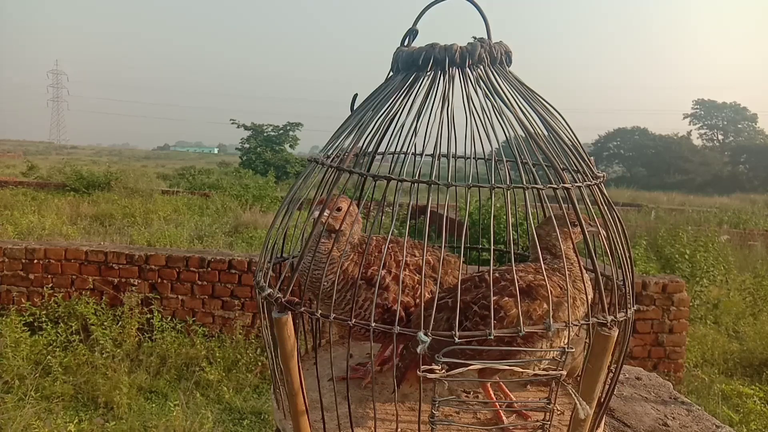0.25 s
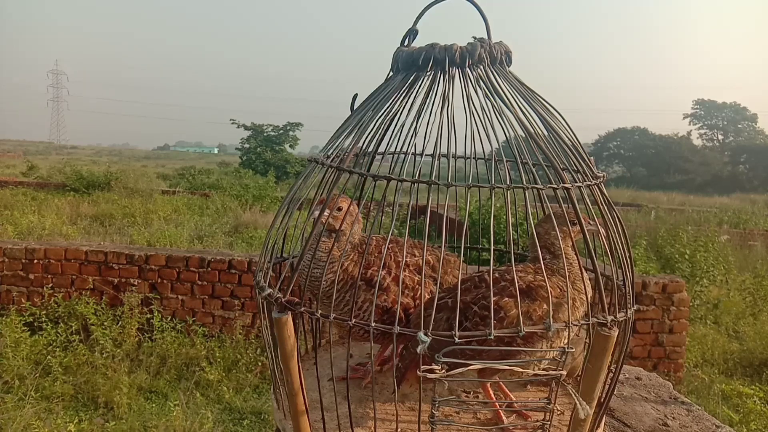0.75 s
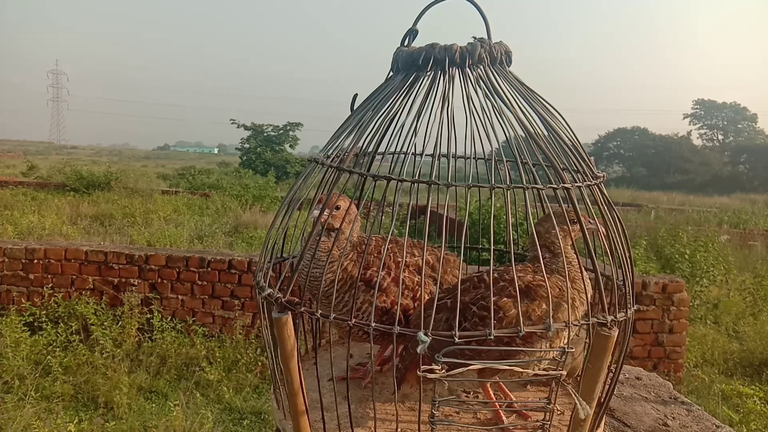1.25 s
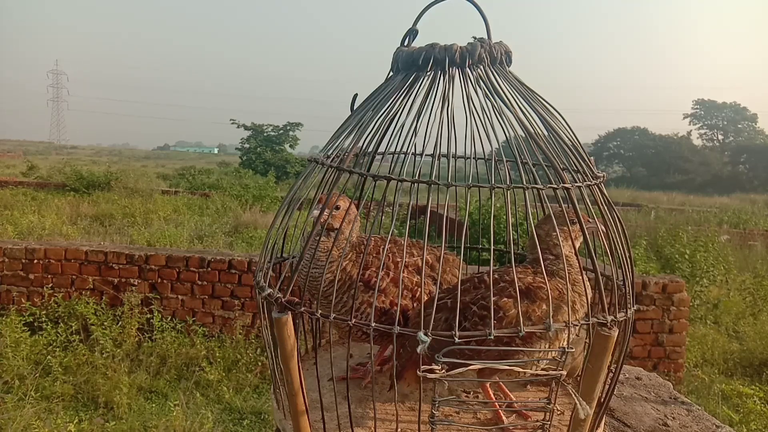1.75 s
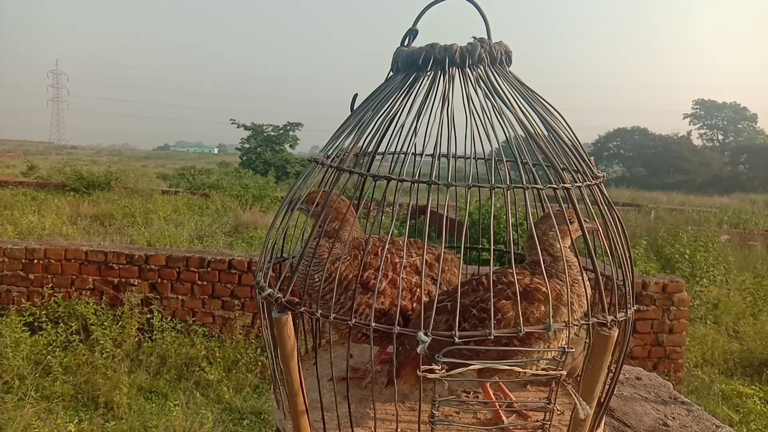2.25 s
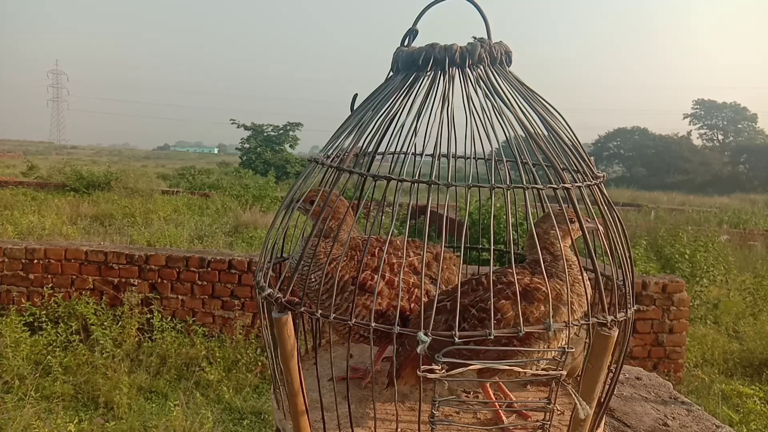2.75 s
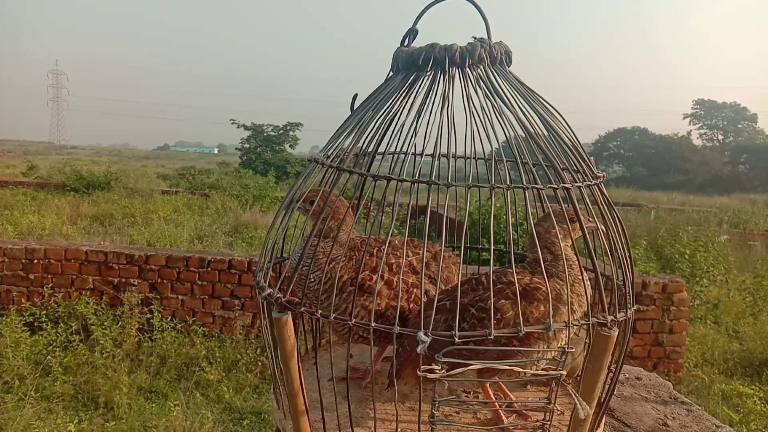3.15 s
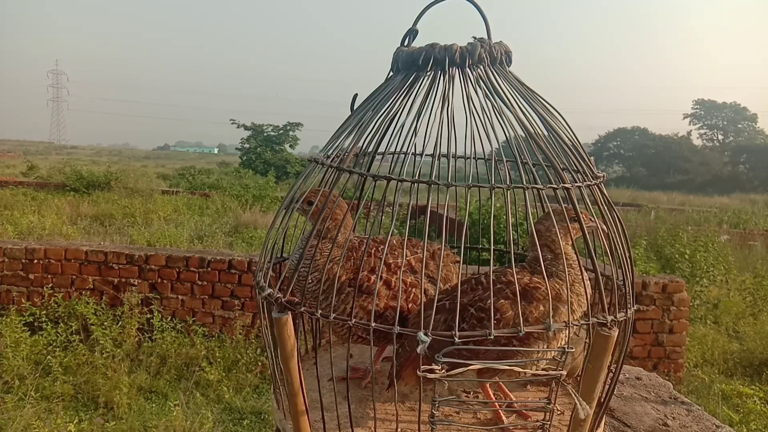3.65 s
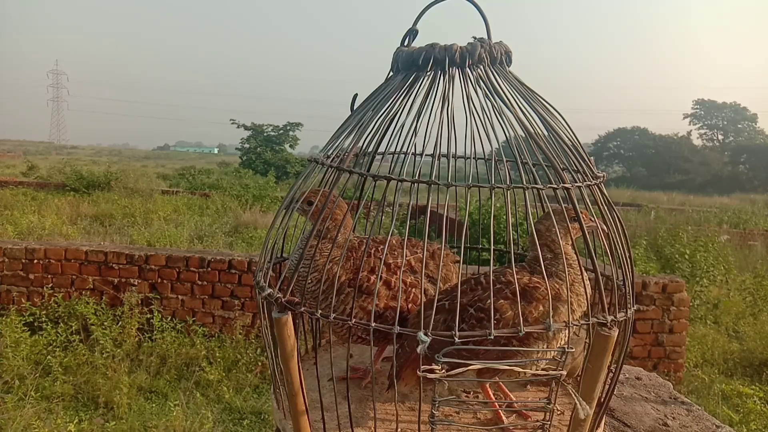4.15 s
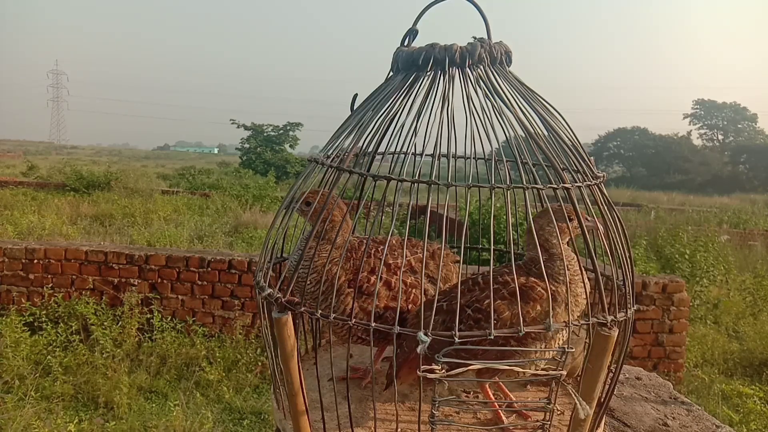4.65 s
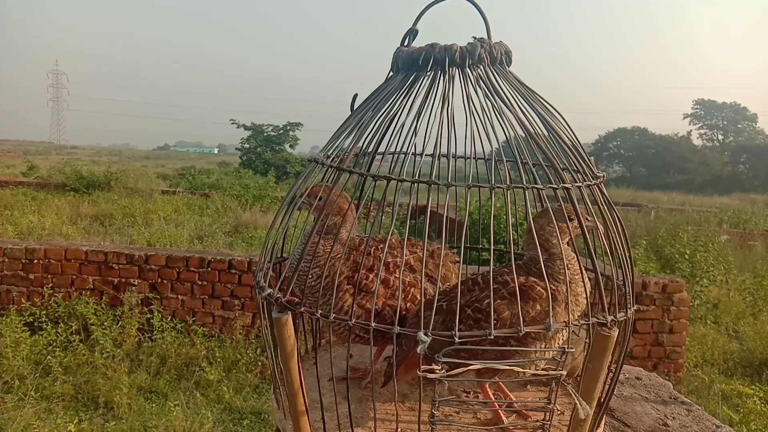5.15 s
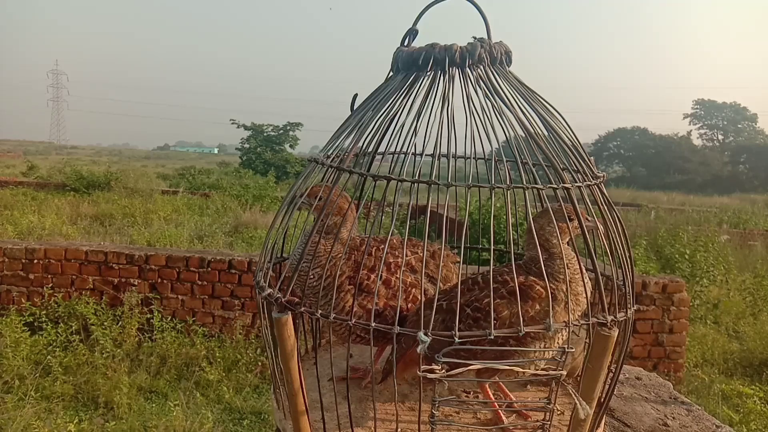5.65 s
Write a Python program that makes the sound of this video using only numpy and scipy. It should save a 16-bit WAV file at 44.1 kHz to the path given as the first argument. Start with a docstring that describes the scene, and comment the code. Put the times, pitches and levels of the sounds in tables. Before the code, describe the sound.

One sharp two-note cluck from a caged francolin close by, amid steady cricket chirping and faint bird whistles in quiet open grassland.

```python
"""A caged francolin close by clucks two notes in open grassland: harmonics filtered by vocal-tract resonances.
Crickets chirp near and far, each wing stroke a swelling tone of falling pitch, and one insect buzzes in phrases
of rapid rings. Small birds give near-sine whistles and faint twitter, and noise bursts scratch at the cage.
Beneath lie an engine hum with its octave, a whir of band noise, and rumble and hiss of shaped noise."""
import sys
import numpy as np
from scipy import signal
from scipy.io import wavfile
from scipy.ndimage import uniform_filter1d

SR = 44100
rng = np.random.default_rng(int(sys.argv[2]) if len(sys.argv) > 2 else 0)


def generate_wav(sig):
    """Save sig (samples, or channels by samples) to the path in sys.argv[1] as 16-bit PCM at SR."""
    pcm = np.round(np.clip(np.atleast_2d(sig).T, -1, 1) * 32767).astype(np.int16)
    wavfile.write(sys.argv[1], SR, pcm)


N = 261072


def gain_of(db):
    """Decibels to amplitude ratio: 20 dB a factor of ten."""
    return 10 ** (np.asarray(db) / 20)


def evened(x):
    """Normalisation to unit root-mean-square amplitude."""
    return x / np.sqrt(np.mean(x ** 2) + 1e-20)


def read(points, hz):
    """Spectral interpolation, linear in level along logarithmic frequency."""
    f, value = np.transpose(points)
    return np.interp(np.log(hz + 1), np.log(f + 1), value)


def add(mix, s, sound):
    """Superposition: the sound is summed into the mix at time s, cut off at both ends of the mix."""
    at = round(s * SR)
    part = mix[max(at, 0):][:len(sound) + min(at, 0)]
    part += sound[max(-at, 0):][:len(part)]


def unroll(rows):
    """Piecewise-linear modulation: turning points become time and one curve a column."""
    s, *columns = np.transpose(rows)
    t = np.arange(s[0], s[-1], 1 / SR)
    return t, *(np.interp(t, s, c) for c in columns)


def wander(length, hz):
    """Low-pass filtered noise: a random modulation of rms near 1 with fluctuations mostly below hz."""
    low_pass = signal.butter(2, hz, fs=SR, output="sos")
    drift = signal.sosfiltfilt(low_pass, rng.standard_normal(length + SR))
    return evened(drift)[SR // 2:][:length]


def band_noise(length, hz, width):
    """Band-pass filtered noise: random sound of rms 1 around one frequency."""
    edges = [max(hz - width / 2, 40), hz + width / 2]
    band_pass = signal.butter(2, edges, "band", fs=SR, output="sos")
    return evened(signal.sosfilt(band_pass, rng.standard_normal(length + 500))[500:])


def coloured(spectrum, patchy_db):
    """Spectral shaping: random short-time spectra with drifting patches, evened to rms 1."""
    hz = np.fft.rfftfreq(2048, 1 / SR)
    a, b, patches = rng.standard_normal((N // 512 + 5, 1025, 3)).T
    smooth_in_hz = uniform_filter1d(patches, 20, 0)
    patches = evened(uniform_filter1d(smooth_in_hz, 6, 1))
    level_db = read(spectrum, hz)[:, None] + patchy_db * patches
    z = (a + 1j * b) * gain_of(level_db)
    return evened(signal.istft(z, nperseg=2048, noverlap=1536)[1][:N])


def echoes(x, t60, first_s):
    """Diffuse reverberation: convolution with a decaying noise tail of energy 1, falling 60 dB in t60 seconds."""
    t = np.arange(SR // 2) / SR
    tail = rng.standard_normal(len(t)) * gain_of(-60 * t / t60) * (t > first_s)
    return signal.fftconvolve(x, tail / np.linalg.norm(tail))[:N]


def peak(hz, centre_hz, width):
    """Resonance: the complex gain of a single resonator passed twice."""
    return 1 / (1 + 2j * (hz - centre_hz) / width) ** 2


def vocal_tract(f, effort_db, throat_hz, beak_db):
    """Source-filter theory: a moving throat resonance and four fixed ones, three subtracted and one added."""
    rim_db = -18 + 0.0086 * (throat_hz - 1600)  # the rim resonance grows as the throat resonance rises
    top_db = -15.5 + rim_db + 1.7 * (effort_db + 22)  # only the loudest effort reaches the top
    tract = peak(f, throat_hz, 600)
    tract -= gain_of(-9) * peak(f, 550, 600)  # chest
    tract -= gain_of(beak_db) * peak(f, 2280, 600)
    tract += gain_of(rim_db) * peak(f, 3650, 910)
    tract /= 1 + (f / (4200 * (throat_hz / 1650) ** .3)) ** 40  # little passes above the rim resonance
    tract -= gain_of(top_db) * peak(f, 5400, 760)
    return tract / (1 + (f / 6300) ** 30)


def cluck(rows):
    """Harmonic series of the syrinx filtered by the tract, with rasp and breath noise: (start s, sound)."""
    t, hz, effort_db, throat_hz, beak_db = unroll(rows)
    turns = np.cumsum(hz * (1 + 0.0065 * wander(len(t), 300))) / SR
    k = np.arange(1, 22)[:, None]  # harmonic numbers
    tract = vocal_tract(k * hz, effort_db, throat_hz, beak_db)
    voice = (tract * np.exp(2j * np.pi * k * turns)).real.sum(0)
    roughness = np.clip(.03 * gain_of(-effort_db - 23.5), 0, 1)  # rougher as the voice weakens
    rasp = roughness * wander(len(t), 900) * voice
    air = gain_of(effort_db - 37) * band_noise(len(t), 14500, 1400)  # a thin hiss at full effort
    return t[0], gain_of(effort_db) * (voice + rasp + air) * signal.windows.tukey(len(t), .05)


def francolin():
    """Direct sound and reverberation: two clucks with returns from cage, then wall and bushes."""
    # one table a note:
    # (time [s], pitch [Hz], effort [dB], throat resonance [Hz], beak resonance [dB])
    clucks = [
        [(1.711, 514, -57.5, 1000, -12), (1.72, 590, -33, 1000, -17), (1.734, 709, -27.5, 1373, -21),
         (1.742, 710, -22, 1570, 0), (1.762, 765, -18.5, 1750, -1), (1.775, 820, -17.5, 1670, -3),
         (1.785, 784, -17, 1700, -0.5), (1.789, 703, -44, 1594, 4), (1.798, 535, -47.5, 1600, -1)],
        [(1.803, 609, -48, 1590, -4), (1.809, 598.4, -25.5, 1630, -12), (1.825, 544.7, -26, 1700, -7.5),
         (1.84, 534.4, -25.5, 1635, -7.5), (1.856, 617.6, -26.5, 1460, -4.5), (1.866, 541, -28, 1580, -0.5),
         (1.877, 412.6, -28, 1300, -37), (1.89, 368.5, -34.5, 1290, -32), (1.908, 333, -38.5, 1320, -30),
         (1.921, 313.4, -42.5, 1260, -35), (1.929, 299, -75, 1240, -19.5)],
    ]
    bird = np.zeros(N)
    for rows in clucks:
        add(bird, *cluck(rows))
    bright_band = signal.butter(4, [2850, 4600], "band", fs=SR, output="sos")
    bright = signal.sosfilt(bright_band, bird)
    cage_return = gain_of(-19.5) * echoes(bird, .1, .003)
    wall_return = gain_of(-17.5) * echoes(bright, 0.36, 0.05)
    return bird + cage_return + wall_return


def chirp(first, last, first_db, last_db, gap_s):
    """Pulse-train timing: times and levels of strokes that slow down while the level climbs early."""
    x = np.linspace(0, 1, round((last - first) / gap_s) + 1)
    times = first + (last - first) * x ** 1.15
    levels_db = last_db + (first_db - last_db) * (1 - x) ** 2.2
    return zip(times, levels_db)


def stroke(db, ms, hz, fall_hz_s, rough, phase):
    """Stridulation: a wing tone of falling pitch swells to 70% of its length, then stops short."""
    share = np.arange(round(ms * SR / 1000)) / (ms * SR / 1000)
    u = (share - .7) * ms / 1000  # seconds from the loudest point
    swell = np.sin(np.pi / 2 * share / .7) ** 2.8
    stop = abs(np.cos(np.pi / 2 * (share - .7) / .3)) ** 0.69
    shape = np.where(share < .7, swell, stop)
    flutter = 1 + rough * np.sin(2 * np.pi * (260 * u + 7 * phase))  # uneven grip of the scraper
    turns = hz * u - fall_hz_s * u ** 2 / 2 + phase
    tone = np.sin(2 * np.pi * turns) + gain_of(-41) * np.sin(4 * np.pi * turns)
    return gain_of(db) * shape * flutter * tone


def near_cricket():
    """Stridulation in pulse trains: quick chirps and slow loud closers, weaker strokes being shorter."""
    # quick chirps: (first stroke [s], last stroke [s], first level [dB], last level [dB])
    quick_chirps = [(.186, .222, -50, -42.5), (.335, .354, -50, -43.5), (.467, .483, -56, -47.5),
                    (.591, .644, -50, -40.5), (.844, .861, -49, -44.5), (.975, .99, -49, -44.5),
                    (1.103, 1.118, -50.5, -46.5), (1.237, 1.273, -49.5, -44), (1.468, 1.503, -50.5, -42.5),
                    (1.612, 1.631, -53, -43), (1.897, 1.941, -45, -40.5), (2.142, 2.16, -50.5, -44),
                    (2.271, 2.289, -51.5, -43.5), (2.407, 2.423, -49, -44.5), (2.523, 2.572, -54, -44),
                    (2.68, 2.716, -58, -41), (2.92, 2.959, -52, -42.5), (3.069, 3.082, -51.5, -45.5),
                    (3.208, 3.224, -49.5, -43), (3.333, 3.363, -54, -44), (3.48, 3.514, -52.5, -41),
                    (3.721, 3.756, -49.5, -42.5), (3.86, 3.892, -54.5, -44.5), (4.007, 4.022, -50, -49),
                    (4.137, 4.173, -49, -44), (4.286, 4.324, -53.5, -41.5), (4.507, 4.562, -52.5, -44.5),
                    (4.68, 4.695, -53, -48), (4.811, 4.83, -52, -44.5), (4.94, 4.958, -50, -44),
                    (5.07, 5.108, -56.5, -41), (5.372, 5.386, -54.5, -46.5), (5.553, 5.57, -53, -46),
                    (5.69, 5.723, -56.5, -43.5), (5.89, 5.908, -59, -55)]
    # two slow, loud strokes close each phrase:
    # (first stroke [s], last stroke [s], first level [dB], last level [dB])
    closers = [(.025, .064, -39, -37), (.686, .723, -37.5, -45.5), (1.311, 1.349, -38.5, -37.5),
               (1.982, 2.019, -37.5, -40.5), (2.756, 2.794, -38, -38), (3.556, 3.595, -37, -37),
               (4.363, 4.403, -38, -37), (5.148, 5.189, -37, -36.5)]
    out = np.zeros(N)
    for rows, gap_s in [(quick_chirps, .0185), (closers, .037)]:  # usual time from stroke to stroke
        for row, phases in zip(rows, rng.random((len(rows), 8))):
            for (s, db), phase in zip(chirp(*row, gap_s), phases):
                ms = max(21 + .8 * (db + 38), 10)
                hz = 5740 * (1 + 0.0089 * np.cos(40 * phase))  # pitch varies from stroke to stroke
                add(out, s - .00068 * ms, stroke(db, ms, hz, 42000, 0.15, phase))
    return out


def farther_crickets():
    """Stridulation at a slower stroke rate, each chirp on its own pitch, with stronger flutter."""
    # (first stroke [s], last stroke [s], first level [dB], last level [dB], pitch [Hz])
    slow_chirps = [(.002, .04, -47, -47, 5890), (0.03, .031, -52.5, -52.5, 6200),
                   (.155, .23, -53.5, -52, 6240), (.658, .658, -49, -51, 5700),
                   (0.831, .904, -54.5, -52.5, 6400), (1.052, 1.052, -59, -60, 6270),
                   (1.349, 1.349, -53, -52.5, 6200), (1.416, 1.416, -56, -57.5, 6330),
                   (1.525, 1.565, -54.5, -58, 6360), (1.853, 1.853, -54, -55, 5530),
                   (1.992, 1.991, -54, -60, 6100), (2.036, 2.036, -54, -57.5, 5700),
                   (2.17, 2.21, -52.5, -53.5, 6330), (2.597, 2.597, -53, -56, 5700),
                   (2.825, 2.861, -56, -57, 6330), (2.936, 2.978, -67.5, -59.5, 6290),
                   (3.254, 3.252, -55.5, -55, 5680), (3.417, 3.45, -58, -53, 6450),
                   (3.64, 3.755, -62, -60, 6330), (3.784, 3.821, -55, -55.5, 5700),
                   (4.058, 4.132, -59, -57.5, 6330), (4.446, 4.484, -57, -56, 5950),
                   (4.584, 4.585, -51.5, -53, 5630), (4.865, 4.865, -60.5, -57, 5740),
                   (4.715, 4.786, -56.5, -56, 6380), (5.258, 5.336, -56, -57, 5690),
                   (5.376, 5.412, -55, -57, 6330), (5.745, 5.785, -55, -65, 5650)]
    out = np.zeros(N)
    for (*row, hz), phases in zip(slow_chirps, rng.random((len(slow_chirps), 8))):
        for (s, db), phase in zip(chirp(*row, .037), phases):
            add(out, s - .017, stroke(db, 24, hz, 45000, .5, phase))
    return out


def cricket_crowd():
    """Superposition of independent sources: faint chirps of three rising strokes at random times."""
    out = np.zeros(N)
    for s, size, pitch, phase in rng.random((110, 4)):
        hz = 5620 + 700 * pitch ** 2
        for k in range(3):
            db = -72 + 3 * k + 9 * size ** 2
            add(out, s * N / SR + 0.017 * k, stroke(db, 12, hz, 50000, .3, phase))
    return out


def crickets():
    """Specular and diffuse reflection: all crickets with two discrete wall returns and a short tail."""
    out = near_cricket() + farther_crickets() + cricket_crowd()
    wall = sum(gain_of(db) * np.roll(out, round(s * SR)) for s, db in [(.019, -24), (.037, -26.5)])
    return out + wall + gain_of(-20) * echoes(out, 0.06, 0.004)


def buzz():
    """Amplitude modulation: short rings near 6.6 kHz, about 140 a second, each phrase fading in and out."""
    # buzzing phrases: (start [s], end [s], level [dB])
    phrases = [(0, 0.238, -61), (.83, 1.426, -62), (2.201, 2.736, -64), (3.416, 3.973, -67),
               (4.63, 5.275, -66.5)]
    out = np.zeros(N)
    for start, end, db in phrases:
        t = np.arange(start, end, 1 / SR)
        beat = np.cumsum(141 * (1 + .015 * wander(len(t), 20))) / SR % 1
        hz = 6640 + 15 * wander(len(t), 6.5) - 150 * (beat - .5)  # falls within each ring
        ring = np.sin(2 * np.pi * np.cumsum(hz) / SR)
        swell = signal.windows.tukey(len(t), .15) * gain_of(db + 0.47 * wander(len(t), 40))
        add(out, start, swell * abs(np.sin(np.pi * beat)) ** 1.8 * ring)
    return out + gain_of(-12) * echoes(out, .2, .004)


def falling_whistles():
    """Frequency modulation that dies away: long falls warble at first, then run clean."""
    # one table a whistle: (time [s], pitch [Hz], level [dB])
    falls = [
        [(1.32, 4400, -74), (1.36, 4130, -67.5), (1.45, 4060, -65.5), (1.52, 3670, -58), (1.56, 3360, -62.5),
         (1.62, 3103, -55.5)],
        [(4.5, 4480, -76), (4.55, 4120, -68), (4.6, 3790, -62), (4.63, 3650, -59.5), (4.7, 3517, -54),
         (4.815, 3160, -53.5)],
    ]
    warble_s, settle_s = .11, .03
    for rows in falls:
        t, hz, db = unroll(rows)
        yield t, hz, db, 114.4 * np.clip((t[0] + warble_s + settle_s - t) / settle_s, 0, 1)


def pips():
    """Amplitude envelope on a nearly constant pitch: notes that swell, then droop at the end."""
    # (start [s], length [s], pitch [Hz], level [dB])
    notes = [(1.454, .1, 2860, -73), (2.217, 0.086, 3130, -67.5), (2.469, 0.099, 3075, -71.5),
             (2.638, .045, 3190, -74), (3.595, .05, 2930, -79), (5.469, 0.1, 3080, -67.5),
             (5.742, 0.085, 3020, -67)]
    # course of every pip: (share of length, pitch offset [Hz], level offset [dB], warble depth [Hz])
    course = [(0, 2, -12, 0), (.5, -11.5, 3, 0), (.78, -18, -4, 0), (1, -220, 2.5, 0.003)]
    for s, length, hz, db in notes:
        yield unroll([(s + length * x, hz + bend, db + swell, w) for x, bend, swell, w in course])


def trills():
    """Frequency modulation about a falling pitch: high warbled notes, bent again in their last fifth."""
    # (start [s], length [s], top [Hz], bottom [Hz], final bend, upward if positive [Hz], level [dB])
    notes = [(1.107, 0.075, 7220, 6470, 200, -54.5), (2.259, 0.09, 6900, 6440, 1, -60.5),
             (3.254, .075, 7230, 6370, 399.5, -61), (4.32, 0.068, 7050, 6500, 4, -67),
             (5.264, 0.103, 6140, 5990, -1, -56), (5.461, 0.071, 7000, 6320, 251.5, -63)]
    # course of every trill:
    # (share of length, height from bottom 0 to top 1, level offset [dB], warble depth [Hz])
    course = [(0, 1, -7, 20), (.27, .8, -4, 90), (.52, .35, 0.5, 130), (.8, 0, 0.5, 120), (1, 0, 3, 40)]
    for s, length, top, bottom, upturn, db in notes:
        rows = [(s + length * x, bottom + h * (top - bottom), db + swell, w) for x, h, swell, w in course]
        t, hz, level, w = unroll(rows)
        yield t, hz + upturn * np.clip(5 * (t - s) / length - 4, 0, 1), level, w


def glides():
    """Parabolic frequency sweep: plain notes that fade at a constant rate on both sides of their peak."""
    # (start [s], length [s], from [Hz], middle [Hz], to [Hz], peak level [dB], share of length at the peak)
    notes = [(0.118, 0.043, 5200, 5200, 5170, -68, 0.44), (0.153, .06, 4780, 4900, 4800, -66, .15),
             (0.213, 0.039, 4500, 4200, 4020, -76, 0.75), (0.137, 0.098, 3980, 3130, 2610, -76, 0.61),
             (0.438, 0.061, 4600, 4780, 4800, -68, 0.89), (0.628, 0.049, 3630, 3840, 3940, -60.5, 0.53),
             (0.668, .04, 4680, 4730, 4750, -68, .9), (0.725, .055, 5200, 5150, 5100, -63, .3),
             (1.092, 0.15, 4400, 5000, 5220, -61.5, 0.37), (1.168, 0.098, 3240, 3230, 3300, -67, 0.42),
             (1.923, 0.11, 3140, 2700, 2370, -66, 0.29), (3, 0.15, 3730, 3630, 3540, -73, .5),
             (3.211, 0.064, 3590, 3460, 4170, -58, 0.76), (3.24, 0.069, 3350, 2880, 2520, -67, 0.56),
             (3.349, 0.037, 4147, 3880, 3480, -74, 0.87), (3.634, 0.047, 4070, 3690, 3420, -74.5, 0.64)]
    fade_db_s = 302
    for s, length, first, middle, last, db, crest in notes:
        x = np.arange(0, length, 1 / SR) / length
        bow_hz = 4 * (middle - (first + last) / 2) * x * (1 - x)
        hz = first + (last - first) * x + bow_hz
        yield s + length * x, hz, db - fade_db_s * length * abs(x - crest), 0 * x


def songbirds():
    """Frequency modulation: near-sine whistles, some warbling 55 times a second; fainter ones break up in the air."""
    out = np.zeros(N)
    for whistles in (falling_whistles(), pips(), trills(), glides()):
        for t, hz, db, warble_hz in whistles:
            swing = np.cos(2 * np.pi * 55 * t + .5 * wander(len(t), 30))
            pitch = hz + warble_hz * swing + 12 * wander(len(t), 80)
            tone = np.sin(2 * np.pi * np.cumsum(pitch) / SR)
            dips = 1 - 0.0012 * warble_hz * (1 - swing)  # quieter at the bottom of each warble
            level = gain_of(db + .2 * (db + 54.5) * wander(len(t), 70))
            add(out, t[0], level * dips * tone * signal.windows.tukey(len(t), .15))
    return out + gain_of(-11) * echoes(out, .18, .003)


def twitter():
    """Reverberant blurring: short distant notes at random pitches, mostly falling, densest at first."""
    out = np.zeros(N)
    for s, pitch, glide, size, length in rng.random((45, 5)):
        x = np.arange(0, 1, 1 / (SR * (.025 + .05 * length)))
        hz = 2700 + 2600 * pitch ** .6 + 1100 * (glide - .7) * x
        note = np.sin(2 * np.pi * np.cumsum(hz) / SR) * np.sin(np.pi * x)
        add(out, s ** 2 * N / SR, gain_of(-86 + 7 * size) * note)
    return out * gain_of(4 * wander(N, 60)) + gain_of(-4.5) * echoes(out, 0.16, .003)


def cage():
    """Transient excitation: brief band-noise bursts that rise fast and decay exponentially."""
    # small bumps and scratches of claws and feathers on the cage:
    # (time [s], noise level before the envelope [dB], centre [Hz], width [Hz], twice the rise time [ms])
    scratches = [(.29, -63, 4800, 300, 11), (.79, -61, 5000, 700, 32), (.337, -58, 5000, 1490, 2.7),
                 (1.969, -51, 4450, 1510, 7.2), (2.04, -57.5, 4900, 497, 11),
                 (2.334, -55, 3780, 2460, 11.7), (2.685, -58, 3600, 1300, 40), (2.73, -58.5, 571, 60, 39),
                 (3.06, -58.5, 770, 60.6, 29), (3.792, -44.5, 109.3, 80, 23), (0.769, -45.5, 128, 139, 30),
                 (4.999, -55.5, 3550, 3960, 11), (5.51, -70.5, 4494, 1506, 26),
                 (5.777, -57, 3480, 3940, 5.9), (5.76, -66, 3620, 499, 50), (5.835, -60.5, 3600, 905, 24)]
    out = np.zeros(N)
    for s, db, hz, width, ms in scratches:
        u = np.arange(round(5 * ms * SR / 1000)) / (ms * SR / 1000)
        add(out, s, gain_of(db) * band_noise(len(u), hz, width) * 2 * u * np.exp(-2 * u))
    return out


def engine():
    """Periodic source with random modulation: a lumpy hum and its octave, with a wavering whir above."""
    # (time [s], pitch [Hz], hum amplitude before its random wobble [dB])
    hum = [(0, 165.8, -63.5), (1, 167.5, -60), (1.6, 165.4, -62), (2, 165.2, -78.5), (4.2, 161.9, -73.5),
           (5.92, 169.7, -76)]
    t, hz, db = unroll(hum)
    turns = np.cumsum(hz + 3 * wander(len(t), 5.1)) / SR
    low = gain_of(db + 3 * wander(len(t), 12)) * np.sin(2 * np.pi * turns)
    octave = gain_of(.5 * db - 41.0 + 6.2 * wander(len(t), 36)) * np.sin(4 * np.pi * turns)
    # a narrow band from far machinery
    out = gain_of(-80 + 3.3 * wander(N, 6.6)) * band_noise(N, 1270, 100)
    add(out, 0, low + octave)
    return out


def open_air():
    """Spectral shaping of noise: rumble, air and the blur of far insects, alike in both ears."""
    # (frequency [Hz], relative spectral level [dB])
    air_spectrum = [(20, -33.5), (45, -19), (95, 4), (180, -6), (260, -14), (500, -19), (1100, -27),
                    (4400, -34), (5200, -29.5), (5730, -24.5), (6900, -25.5), (7700, -46.5), (9500, -32.5),
                    (10500, -42.5), (15500, -40.5)]
    return gain_of(-59.5) * coloured(air_spectrum, patchy_db=2.18)


def hiss():
    """Interaural difference: shaped noise to be added in one ear and subtracted in the other."""
    # (frequency [Hz], relative spectral level [dB])
    hiss_spectrum = [(15, -48), (25, -7.5), (119, -5.5), (421, -6.5), (1080, -10), (1240, -2.5),
                     (1620, -9.5), (5730, -15), (7700, -26.5), (15500, -15)]
    return gain_of(-75.5) * coloured(hiss_spectrum, patchy_db=1.86)


def scene():
    """Mid-side stereo: sources shared by both ears, with hiss and faint echoes of opposite sign."""
    voices = francolin() + crickets() + buzz() + songbirds() + twitter() + cage()
    mid = voices + engine() + open_air()
    side = hiss() + gain_of(-66.5) * echoes(voices, .03, 0)
    return np.array([mid + side, mid - side])


def record(dry):
    """Band limiting: a linear-phase low-pass filter with its edge at 15480 Hz."""
    low_pass = signal.firwin(2047, 15480, window=("kaiser", 9), fs=SR)
    return signal.oaconvolve(dry, low_pass[None], "same")


dry = scene()
out = record(dry)
generate_wav(out)
```